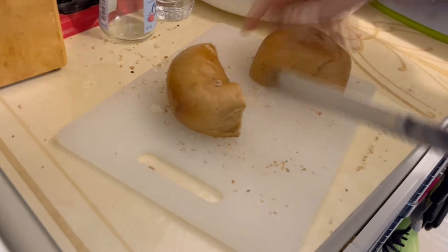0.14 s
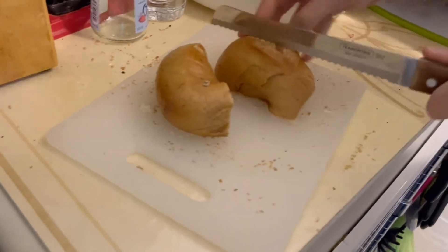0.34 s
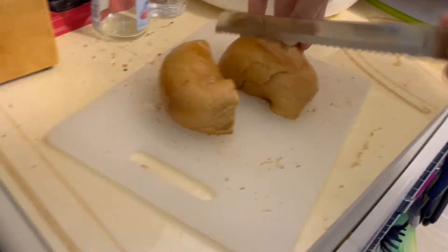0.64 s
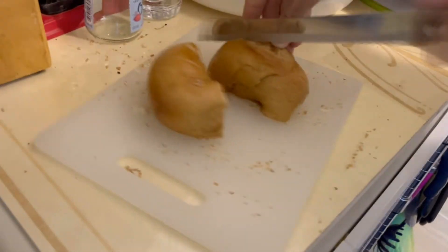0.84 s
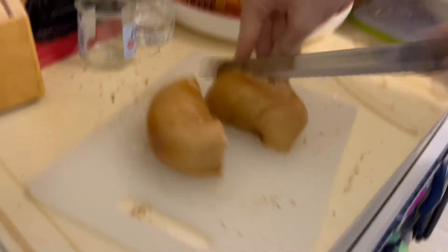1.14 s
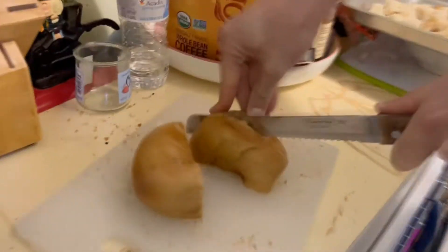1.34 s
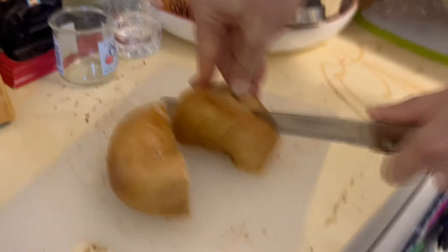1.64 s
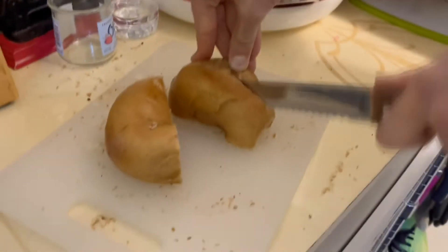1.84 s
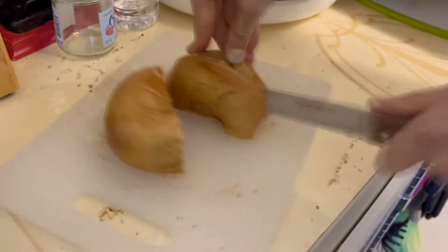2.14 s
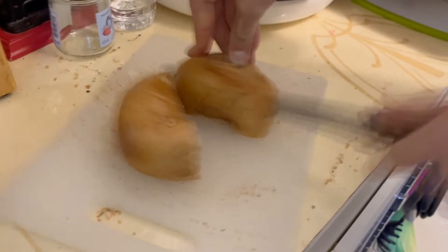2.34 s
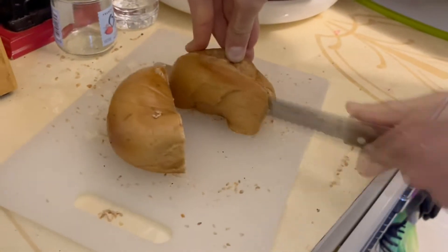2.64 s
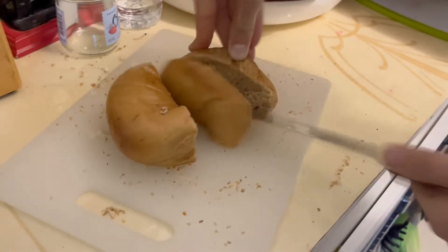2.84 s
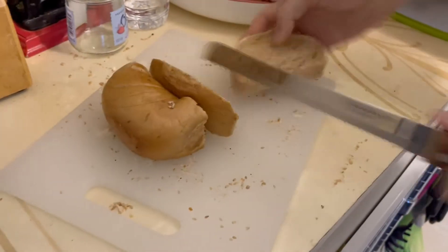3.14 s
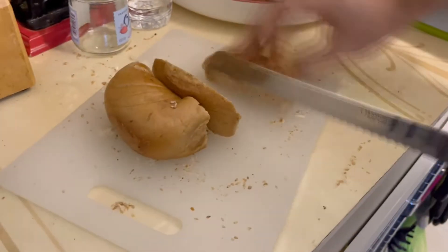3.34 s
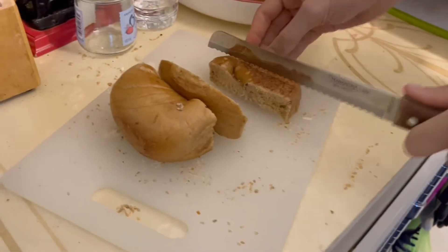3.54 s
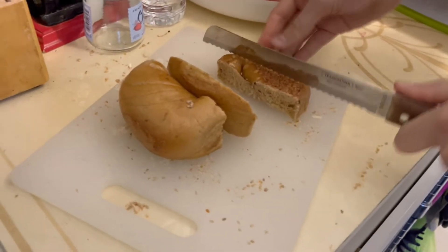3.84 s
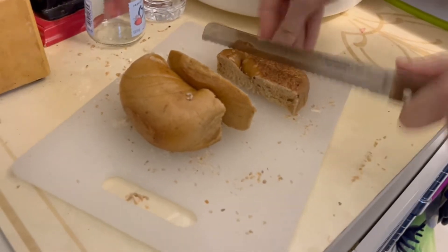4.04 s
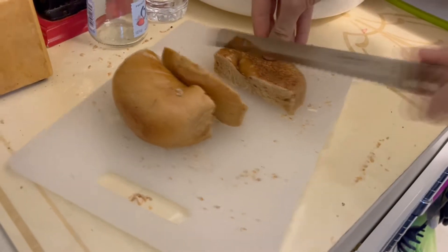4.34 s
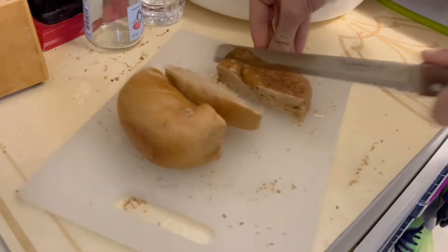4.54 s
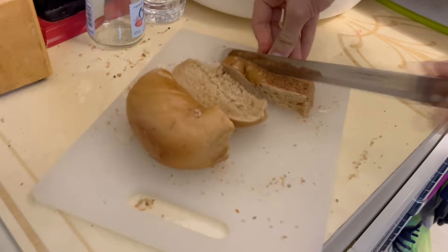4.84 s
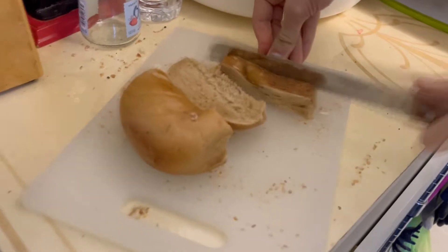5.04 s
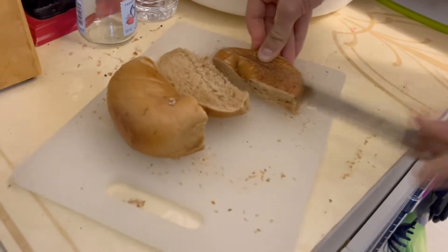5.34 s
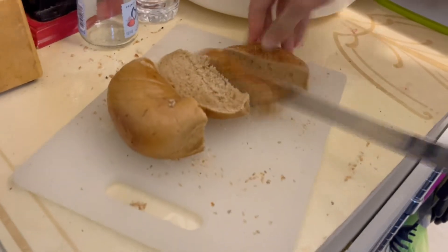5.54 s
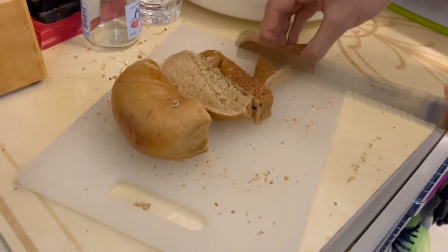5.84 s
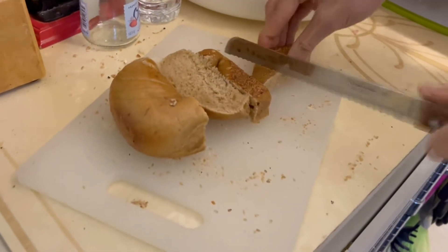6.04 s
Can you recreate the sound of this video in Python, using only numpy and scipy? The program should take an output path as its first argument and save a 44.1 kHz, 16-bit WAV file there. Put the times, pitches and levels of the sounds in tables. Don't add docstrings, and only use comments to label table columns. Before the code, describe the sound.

A stale bagel is set down with a hard clack, then sawn in short rhythmic rasps, gritty and crackling, ringing the thin plastic board and shaking the counter. A pause holds only light bumps and rustles of bread. Sawing resumes harder, with biting snaps and hollow knocks, and stops into faint handling. Close phone pickup, fairly dry small kitchen, with a barely audible appliance hum.

```python
import sys
import numpy as np
from scipy import signal
from scipy.fft import rfft, irfft
from scipy.io import wavfile
from scipy.ndimage import uniform_filter1d

SR = 44100
rng = np.random.default_rng(int(sys.argv[2]) if len(sys.argv) > 2 else 0)


def gain_from_db(level_db):
    decades = np.asarray(level_db, float) / 20
    return 10 ** decades


def store_wav(level_fs):
    pcm = np.round(np.clip(np.atleast_2d(level_fs), -1, 1) * 32767)
    wavfile.write(sys.argv[1], SR, pcm.T.astype(np.int16))


N = 273420
STEP = 32

# (centre [s], length [ms], board level [dB], hardness [dB], board pitch [Hz])
CRUST_CUT = [(0.699, 51, -77.5, 15.5, 344), (0.737, 17, -43.5, -13, 290), (0.763, 36, -44.5, -15.5, 298),
             (.802, 35, -46.5, -11.5, 296), (0.838, 35, -43, -13.5, 294), (0.907, 21, -41, -9, 350),
             (0.94, 35, -43, -6.5, 328), (0.977, 18, -36.5, -15.5, 327), (1.047, 28, -39, -8.5, 357),
             (1.086, 18, -42, -14, 340), (1.118, 44, -37, -12, 330), (1.193, 31, -36, -9.5, 380),
             (1.268, 29, -38, -11.5, 355), (1.343, 27.5, -40, -6.5, 310), (1.382, 30, -50, -3.5, 447),
             (1.419, 22.5, -44, -4, 500), (1.459, 20, -50, -3, 323), (1.501, 30, -40.5, -8, 310),
             (1.538, 26, -49.5, -3, 380), (1.573, 33, -43.5, -6, 400), (1.612, 20, -50.5, -2.5, 387),
             (1.647, 41, -44, -4.5, 378), (1.727, 40, -53.5, -1.5, 450), (1.774, 30, -48, -4, 505),
             (1.818, 33, -50.5, -6.5, 398), (1.864, 14, -50, -6, 342), (2, 44, -52.5, -3.5, 412)]
SECOND_CUT = [(4.265, 22, -50, -16, 330), (4.309, 33, -36.5, -17.5, 261), (4.413, 58, -41.5, -13, 263),
              (4.446, 23, -31.5, -13, 300), (4.514, 25, -43.5, -4.5, 298), (4.549, 74, -47.5, -10, 440),
              (4.588, 77, -44.5, -7, 374), (4.66, 31.6, -35, -10, 306), (4.699, 28, -48, -5, 336),
              (4.731, 26, -39.5, -5, 475), (4.8, 33.7, -32.5, -8.5, 350), (4.912, 26, -46.5, -3.5, 497),
              (4.956, 42, -31.5, -10, 460), (5.048, 12, -46, -3.5, 400), (5.088, 37, -31, -9, 400),
              (5.12, 20, -40.5, -5, 400), (5.21, 14, -44, -8, 355), (5.238, 15, -65, 4, 425),
              (5.276, 22, -41.5, -6.5, 327), (5.394, 60, -42, -7, 480), (5.426, 26, -43.5, -0.5, 400),
              (5.469, 25, -68, 14, 503), (5.49, 17, -68.5, 18, 400), (6.19, 26, -58, -5, 358)]
# (centre [s], length [ms], board level [dB], hardness [dB], free blade [dB])
CRUMB_CUT = [(1.945, 8.1, -47, -11.5, -17), (2.064, 66, -51, -8, -20), (2.154, 30, -48, -5, -17.5),
             (2.227, 67, -51, -4, -13), (2.301, 37, -34.5, -10.5, -19.5), (2.382, 45, -51, -3, -6),
             (2.448, 52, -46.5, -4, -13.5), (2.506, 55, -49, -4, -13.5), (2.574, 21, -38.5, -16, -22),
             (2.609, 34, -45.5, -2.5, -24), (2.665, 75, -56, -7, -26), (2.716, 35, -46, -6, -40),
             (2.759, 19, -43.5, -3, -14), (2.826, 27, -63, 8, 2), (2.864, 34, -50.5, 0, -10)]
HANDLING = [(0.16, 15.5, -49.5, -1, -10), (0.178, 24.5, -39, -1.5, -25), (0.29, 41.6, -48.5, -5.5, -13.5),
            (0.409, 26.4, -42, -16, -26), (0.523, 22.4, -38.5, -5, -17.5), (2.988, 26, -38, -19, -32),
            (3.059, 25, -58, -4, -13), (3.099, 33, -51.5, -3.5, -46), (3.321, 27, -61.5, -9, -20),
            (3.355, 61, -70.5, -2, -21), (3.409, 37, -45, -11, -22), (3.454, 38, -46.5, -7.5, -38),
            (3.593, 31, -50.5, -12, -36), (3.671, 33, -54.5, -10.5, -18), (3.764, 27, -54.5, -11, -21),
            (3.811, 24, -63, -20, -31), (3.887, 25, -61.5, -8, -21), (3.998, 20, -72, -5, -12),
            (4.098, 21, -57, -13, -17.5), (4.189, 21, -50.5, -15.5, -58), (5.56, 37, -56, -0.5, -33),
            (5.629, 51, -47.5, -6.5, -26), (5.719, 30, -54.5, -4, -12), (5.76, 87, -59.5, -5, -15),
            (5.831, 37, -64, -3.5, -19), (5.874, 17, -58, -12, -13), (5.898, 14, -56.5, -13, -27),
            (5.965, 26, -48, -13, -23), (6.122, 28, -38.5, -15, -24)]
# (at hardness 0 [dB], per hardness [dB/dB], per board level [dB/dB])
BLADE_SHARE = [
    (-3, 2, 0.8348),
    (-10.5, 0.53, -0.054),
]
# (pitch [Hz], per force [dB/dB], per hardness [dB/dB])
LOOSE_PITCH = [
    (400, 0.03, 0.06),
    (380, -0.12, 0.15),
]


def all_strokes():
    rows = []
    for cut, (base_db, by_hard, by_force) in zip((CRUST_CUT, SECOND_CUT), BLADE_SHARE):
        for s, ms, db, hard_db, hz in cut:
            blade_db = base_db + by_hard * hard_db + by_force * (db + 51)
            rows.append((s, ms, db, hard_db, blade_db, hz))
    for cut, (base_hz, by_force, by_hard) in zip((CRUMB_CUT, HANDLING), LOOSE_PITCH):
        for s, ms, db, hard_db, blade_db in cut:
            hz = base_hz * gain_from_db(by_force * (db + 47.5) + by_hard * hard_db)
            rows.append((s, ms, db, hard_db, blade_db, hz))
    return sorted(rows)


STROKES = all_strokes()
# (time [s], level [dB])
PRESSURE = [(0.0, -79.5), (0.74, -77.5), (0.96, -53.5), (1.98, -65.5), (2.61, -58), (2.93, -57.5),
            (3.069, -82), (4.14, -83.5), (4.49, -55.5), (5.22, -54), (5.5, -56), (5.68, -81.5), (6.2, -79)]
# (time [s], peak [dB], snap
# minus peak [dB], blow minus peak [dB])
KNOCKS = [(0.166, -47, 8, 11), (0.5101, -36, -5, -18), (1.107, -49, -13, 2), (1.3371, -31.5, -20, -0.5),
          (1.6174, -35.5, 2, -14), (1.637, -35, 7, -3), (2.571, -49.5, 23, -16), (2.7442, -51, 16, -16),
          (3.3975, -43, 25, -7), (3.4149, -45, 21.5, -8), (3.4384, -47, 1, 3), (3.457, -40, -3, 3),
          (4.4434, -23, -31, -24), (4.5038, -29, -32, -38), (5.355, -34, -15, -18), (5.379, -44.5, 15.5, 9),
          (5.472, -47, 19, -6), (5.489, -46.5, 20, -13)]
DRAG_DB = (0, -5.5, -10.5)


def effort(body, rise=0.32, fall=0.31, flat=1.506, before_db=-14):
    t = np.arange(N) / SR
    drag_s, drag_db = np.transpose(PRESSURE)
    snap_s = np.transpose(KNOCKS)[0]
    power = gain_from_db(np.interp(t, drag_s, drag_db + DRAG_DB[body])) ** 2
    for row in STROKES:
        s, length_s = row[0], row[1] / 1000
        near = slice(max(int((s - 3 * length_s) * SR), 0), int((s + 3 * length_s) * SR))
        late = (t[near] - s) / length_s
        swell = np.exp(-np.abs(late / np.where(late < 0, rise, fall)) ** flat)
        early = snap_s[(snap_s > s - .8 * length_s) & (snap_s < s - .25 * length_s)]
        if len(early):
            if early[0] > s - .5 * length_s:
                swell[(late < 0) & (t[near] >= early[0])] = 1
            swell[t[near] < early[0]] *= gain_from_db(before_db) ** 2
        level_db = row[2] + (row[2 + body] if body else 0)
        power[near] += swell * gain_from_db(level_db) ** 2
    return np.sqrt(power)


def crumbs(spread_db=2.0, tooth_depth=0.63, tooth_hz=290):
    phase = np.cumsum(tooth_hz * 2 ** (0.49 * held(60)[:N])) / SR % 1
    grain_db = spread_db * np.minimum(rng.exponential(size=N // STEP + 1), 4.5)
    grain_db = grain_db + 4.55 * held(120, STEP)
    catch = 1 + tooth_depth * np.exp(-phase / 0.06)
    return np.repeat(gain_from_db(grain_db), STEP)[:N] * catch


# (centre [Hz], width [Hz], level [dB])
BOARD = [(240, 15, 4), (297.5, 52.6, 10), (350, 42, -3), (413, 114, -3), (480, 60, 0), (520, 33, -6),
         (593, 60, -26), (677, 30, -0.5)]
CRUST = [(830, 880, -24), (1045, 65, -3.5), (1173, 350, 7), (1400, 154, 6.5), (1780, 220, 0.5),
         (2000, 740, 9), (2280, 560, -4), (2565, 350, 1), (3150, 1160, 11.5)]
BLADE = [(4680, 330, -25), (5320, 1000, -5), (7700, 3300, 9.5), (8800, 7000, -10), (10800, 4100, -3),
         (12500, 3200, -3.5), (15100, 1000, -17)]


def sawing(forces, sizes, crust_top_hz=5500):
    t = np.arange(N // STEP + 1) * STEP / SR
    strokes = np.transpose(STROKES)
    noise = rng.standard_normal(N)
    tearing = sizes * noise
    board_hz = np.interp(t, strokes[0], strokes[5])
    board = ring(sizes ** 0.52 * noise, BOARD, board_hz, focus_db=29.0)
    crust_hz = np.interp(t, strokes[0], 1300 * 2 ** np.clip((strokes[3] + 6) / 12, -1, .6))
    crust = ring(tearing, CRUST, crust_hz, focus_db=5, wander_db=7)
    crust = signal.sosfilt(signal.butter(2, crust_top_hz, fs=SR, output="sos"), crust)
    blade_hz = np.where((t > 1.9) & (t < 2.95), 15500, 8000)
    blade = ring(tearing, BLADE, blade_hz, focus_db=3.5, wander_db=23.0)
    out = forces[0] * steady(board, 0.032)
    out -= forces[1] * steady(crust, 0.018)
    out += forces[2] * steady(blade, 0.099)
    return out + tears(tearing)


# (centre [s], length [ms], level [dB], pitch [Hz])
TEARS = [(.765, 6, -57, 2590), (1.641, 12, -49, 3230), (2.295, 34, -59, 2980), (2.33, 13, -55, 1300),
         (2.368, 11, -59, 2930), (2.441, 22, -61, 3030), (2.445, 16, -59, 1330), (2.515, 21, -59.5, 1200),
         (2.575, 22.5, -54.5, 2980), (2.575, 24, -55.5, 1380), (2.609, 43, -58, 1390),
         (2.61, 35, -60, 2800), (2.717, 29, -52, 1330), (2.715, 23, -59, 2900), (2.755, 23, -59.5, 2770),
         (2.76, 19, -50, 1260), (2.85, 26, -55.5, 1300), (3.096, 20, -53, 1290), (3.105, 13, -58, 1600),
         (3.403, 9.7, -57, 4560), (3.4, 10, -54, 2400), (3.442, 15, -52, 1320), (3.461, 9.8, -50, 990),
         (3.405, 21, -50, 400), (5.358, 2.5, -42, 3320), (0.178, 6.1, -51, 2640), (3.1, 16, -64, 2730),
         (4.8, 16, -57, 2840), (4.95, 13, -43, 1360), (4.949, 13, -47, 3100), (5.085, 27, -47, 1430),
         (5.08, 22, -54, 2900), (4.955, 25, -41, 520), (5.085, 25, -41, 520), (5.388, 26, -49.5, 2900),
         (5.389, 30, -46.5, 1400), (5.425, 18, -59, 2200), (5.431, 15, -58, 3400), (5.459, 17, -52, 1000),
         (5.474, 5, -53, 2200), (5.476, 5.6, -50, 1200), (5.492, 7.5, -66, 2060), (5.495, 11, -58, 1200),
         (5.49, 54, -64, 2720), (5.556, 15, -58, 1280), (5.565, 20, -70, 2700), (5.604, 12, -57.5, 1120),
         (5.639, 16, -52, 1250), (5.633, 18, -50, 320), (5.386, 23, -42, 428)]
NUDGES = [(.178, 20, -42, 275), (6.12, 29.6, -41.5, 502), (6.125, 15, -69, 780), (3.957, 11, -74, 5300),
          (6.13, 3.6, -52, 12700), (6.147, 4, -53.5, 12200), (6.147, 4, -58, 14800), (.525, 15, -51.5, 680),
          (5.875, 7.7, -76, 8400), (.283, 30, -53.5, 530), (.455, 35, -65, 270)]


def tears(tearing, width=.22):
    out = np.zeros(N)
    for s, ms, db, hz in TEARS + NUDGES:
        span = int(2 * ms / 1000 * SR)
        start = int(s * SR) - span // 2
        near = slice(start, start + span)
        edges_hz = [hz / (1 + width / 2), hz * (1 + width / 2)]
        band = signal.butter(2, edges_hz, "band", fs=SR, output="sos")
        rung = signal.sosfilt(band, tearing[near] * np.hanning(span))
        out[near] += gain_from_db(db) * rung / np.sqrt(2 * np.mean(rung ** 2))
    return out


# (time [s], peak [dB], crust snap minus peak [dB])
TICKS = [(0.1496, -56, 11), (.177, -27, -12), (0.5266, -34, -23), (0.7326, -29, -13), (0.765, -34, -18),
         (.797, -41, -14), (.8395, -36, -15), (.885, -33, -32), (0.945, -24, -33), (.903, -42, -11),
         (0.9286, -44, -16), (1.0344, -47, -6), (1.1802, -46, -10), (1.198, -31, -3), (1.265, -42, -9),
         (1.4209, -56, -3), (1.495, -34, 4), (1.5993, -40, -6), (1.935, -52, -9), (1.9466, -49, -11),
         (1.992, -36, -9), (2.0882, -50, -17), (2.3845, -44, -10), (2.7582, -36, 2), (2.9825, -56, 28.5),
         (3.06, -56, 2), (3.0954, -57, 23), (3.3154, -61, 22), (3.573, -56, 17), (3.578, -54, 12),
         (4.0846, -60, -8), (4.1016, -49.5, -13), (3.591, -45.5, 16), (3.951, -44.5, -17),
         (4.2594, -51.5, 7), (4.2957, -47, -10), (4.3899, -46, -14), (4.407, -40, -10), (4.46, -48, -10),
         (4.521, -27.5, -13), (4.5905, -32, -7), (4.6543, -28, -3), (4.673, -28, -15), (4.931, -40, -10),
         (5.044, -33, -5), (5.0759, -39, -10), (5.134, -33, -8), (5.273, -47, -9), (4.547, -27, -21),
         (4.726, -24, -11), (4.796, -22, -7), (4.9455, -24.5, 3), (5.122, -30, 3), (5.2371, -25.5, -7),
         (5.961, -48.5, 11.5), (6.104, -56, -5), (6.124, -46, -15), (6.146, -46, -15)]
TICK_BLOW_DB = -28
CRACKS = sorted([(s, db, snap_db, TICK_BLOW_DB) for s, db, snap_db in TICKS] + KNOCKS)


def cracks(tick_s=0.0013, tick_rise_s=0.0017, snap_s=0.0023):
    tick, snap, blow = np.zeros((3, N))
    age = np.arange(500) / SR
    for s, db, snap_db, blow_db in CRACKS:
        at = int(s * SR)
        near = slice(at, at + len(age))
        burst = rng.standard_normal(len(age))
        tick[near] += gain_from_db(db) * burst * np.exp(-age / tick_s) * (1 - np.exp(-age / tick_rise_s))
        snap[near] += gain_from_db(db + snap_db) * burst * np.exp(-age / snap_s)
        blow[at] = gain_from_db(db + blow_db)
    out = gain_from_db(-3.5) * ring(tick, BLADE, 12600, 3.0)
    out += gain_from_db(-18.5) * ring(snap, CRUST, 2280, 23.0)
    out += gain_from_db(16.0) * ring(blow, BOARD, 470, 23.0)
    return out - gain_from_db(2.0) * ring(blow, CRUST, 1000, 21.2)


# (time [s], peak [dB], pitch [Hz], T60 [s])
THUDS = [(.169, -15, 505, 0.027), (.17, -23.5, 1030, 0.022), (.176, -34.5, 830, 0.048),
         (.181, -23, 153, 0.077), (0.408, -35, 141, 0.1), (.516, -29, 285, 0.033), (.523, -23, 140, 0.057),
         (2.98, -32, 280, .05), (4.3, -35, 235, 0.088), (.533, -31, 329, 0.033), (3.397, -33.5, 287, 0.039),
         (3.408, -43, 150, 0.093), (3.4385, -32, 400, 0.032), (3.446, -34.5, 140, 0.095),
         (3.457, -38, 327, 0.029), (6.133, -46, 141, 0.086), (5.896, -39, 109, 0.057)]


def thuds(contact_cycles=0.26):
    out, age = np.zeros(N + SR // 4), np.arange(SR // 4) / SR
    for s, db, hz, t60_s in THUDS:
        at = int(s * SR)
        rise = 1 - np.exp(-age * hz / contact_cycles)
        out[at:at + len(age)] -= gain_from_db(db - 60 * age / t60_s) * rise * np.sin(2 * np.pi * hz * age)
    return out[:N]


# (time [s], level [dB], counter pitch [Hz])
FIRST_ROCKS = [(.205, -39, 90), (.29, -39.5, 100), (.535, -41, 90), (.767, -42, 98), (.851, -41, 91),
               (0.935, -38, 138), (.991, -39, 83), (1.122, -38.5, 89), (1.195, -38.5, 100),
               (1.286, -41, 83), (1.348, -34.5, 85), (1.417, -40, 92), (1.501, -36.5, 78),
               (1.582, -32, 104), (1.658, -33.5, 94), (1.732, -37.5, 90), (1.819, -43.5, 111),
               (1.891, -47, 88), (1.996, -43.5, 90), (2.089, -41, 107), (2.161, -41, 138),
               (2.232, -39, 121), (2.301, -40, 120), (2.378, -43.5, 98), (2.456, -40.5, 120),
               (2.511, -39.5, 75), (2.586, -42.5, 107), (2.891, -46, 91), (2.998, -39.5, 80),
               (3.454, -36.5, 128)]
SECOND_ROCKS = [(4.322, -35.5, 83), (4.375, -42, 86.5), (4.443, -34.5, 92), (4.522, -40, 95),
                (4.584, -36, 81.4), (4.669, -38.5, 101), (4.725, -35.5, 73.6), (4.81, -29, 121),
                (4.875, -38, 89), (4.957, -31, 113), (5.005, -32.5, 83.5), (5.151, -37, 76.5),
                (5.272, -45, 115), (5.337, -39, 94), (5.432, -36.5, 125), (5.528, -51, 74)]
# 7.8 ms, -44 dB, 115 Hz
LANDINGS = [(row[0] + 0.0078, min(-39.5 + 0.95 * (row[2] + 44.5), -44), 115) for row in HANDLING]
THUMPS = sorted(FIRST_ROCKS + SECOND_ROCKS + LANDINGS)
# (centre [Hz], width [Hz], level [dB])
COUNTER = [(69, 18, 3.5), (101, 34, -5), (142.3, 18.5, 2.5)]


def counter(lead_s=0.0134, push_s=0.0055, drag_gain_db=5.5, give=0.19):
    t = np.arange(N) / SR
    s, db, hz = np.transpose(THUMPS)
    force = np.zeros(N)
    force[((s - lead_s) * SR).astype(int)] = gain_from_db(db) * rng.choice([-1, 1], len(s))
    push = np.hanning(int(push_s * SR))
    press_and_spring = np.r_[push, -.5 * push] / push.sum()
    pushes = gain_from_db(26.5) * np.convolve(force, press_and_spring)[:N]
    drag_s, drag_db = np.transpose(PRESSURE)
    shake_db = drag_db + drag_gain_db - give * (drag_db + 55.0)
    shake = gain_from_db(np.interp(t, drag_s, shake_db)) * rng.standard_normal(N)
    centre_hz = np.interp(np.arange(N // STEP + 1) * STEP / SR, s - lead_s, hz)
    return ring(pushes + shake, COUNTER, centre_hz, focus_db=18.0)


def ring(x, modes, centre_hz, focus_db, wander_db=0.):
    out, total = 0, 0
    for hz, width_hz, db in modes:
        r, turn = np.exp(-np.pi * width_hz / SR), 2 * np.pi * hz / SR
        off_octaves = np.abs(np.log2(hz / centre_hz))
        share = gain_from_db(db - focus_db * off_octaves + wander_db * held(22, STEP))
        share = np.repeat(share, STEP)[:N]
        gain = np.sqrt(2 - 2 * r * r) * np.sin(turn)
        out = out + signal.lfilter([0, gain], [1, -2 * r * np.cos(turn), r * r], share * x)
        total = total + share ** 2
    return out / np.sqrt(total)


def steady(x, span_s):
    k = int(span_s * SR)
    power = uniform_filter1d(uniform_filter1d(x ** 2, k), k)
    return x / np.sqrt(power + 1e-3)


def held(rate_hz, step=1):
    k, size = int(SR / rate_hz / step), N // step + 1
    levels = np.repeat(rng.standard_normal(size // k + 1), k)
    return 0.47 * uniform_filter1d(levels, k)[:size]


def kitchen(x, t60_s=0.092, level_db=-10.5):
    t = np.arange(int(.3 * SR)) / SR
    tail = rng.standard_normal(len(t)) * gain_from_db(-60 * t / t60_s) * (t > .002)
    tail *= gain_from_db(level_db) / np.sqrt(np.sum(tail ** 2))
    return x + signal.fftconvolve(x, tail)[:N]


# (frequency [Hz], density [dB/Hz])
HUM = [(18, -50), (30, -20), (70, 10.5), (103, -13), (394, -22.5), (500, -27), (844, -25), (1400, -40),
       (16000, -61)]


def hum(level_db=-62, whine_hz=12866, whine_db=-108):
    hz = np.fft.rfftfreq(N, 1 / SR)
    at_hz, density_db = np.transpose(HUM)
    colour_db = np.interp(np.log(hz + 1), np.log(at_hz + 1), density_db)
    x = irfft(gain_from_db(colour_db) * rfft(rng.standard_normal(N)), N)
    whine = gain_from_db(whine_db) * np.sin(2 * np.pi * whine_hz * np.arange(N) / SR + 3 * held(30)[:N])
    return x * gain_from_db(level_db + 6.3 * held(8.8)[:N]) / np.sqrt(np.mean(x ** 2)) + whine


# (frequency [Hz], left lead [rad], likeness [0-1], left minus right [dB])
PORTS = [(0, 0, 1, 0), (250, .25, .98, -.5), (600, .7, .8, 2), (1100, .5, .7, 3.5), (1600, -.7, .5, 3),
         (2200, 0, .9, 1.5), (3600, 1.3, .6, 1.5), (4900, .1, .7, 1), (5700, -2.2, .65, 1),
         (6500, -3, .65, .5), (8600, -6.1, .95, 0), (10000, -6.7, .8, 0), (12600, -9.4, .95, 0),
         (15800, -12.4, .78, 0)]


def ports(shared, apart):
    hz = np.fft.rfftfreq(N, 1 / SR)
    at_hz, *columns = np.transpose(PORTS)
    lead_rad, alike, balance_db = (np.interp(hz, at_hz, column) for column in columns)
    half = gain_from_db(balance_db / 2) * np.exp(.5j * lead_rad)
    mid = rfft(shared) * np.sqrt((1 + alike) / 2)
    side = 1j * rfft(apart) * np.sqrt((1 - alike) / 2)
    return irfft(np.array([(mid + side) * half, (mid - side) / half]), N)


def scene():
    forces, sizes = [effort(body) for body in range(3)], crumbs()
    shared, apart = (kitchen(sawing(forces, sizes) + cracks() + thuds()) + hum() for path in range(2))
    return ports(shared + counter(), apart)


def low_pass(x):
    return signal.sosfilt(signal.butter(12, 16970, fs=SR, output="sos"), x)


def record(dry):
    x = signal.sosfilt(signal.butter(3, 42, "high", fs=SR, output="sos"), dry)
    x = signal.sosfilt(signal.ellip(8, .2, 60, 15800, fs=SR, output="sos"), x)
    return low_pass(x)


dry = scene()
out = record(dry)
store_wav(out)
```